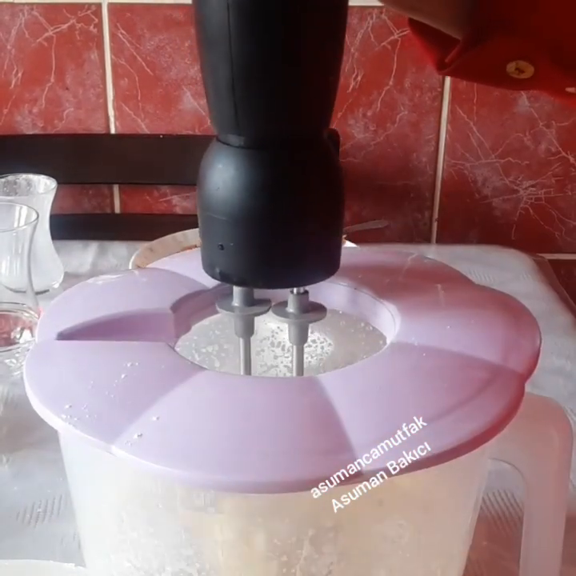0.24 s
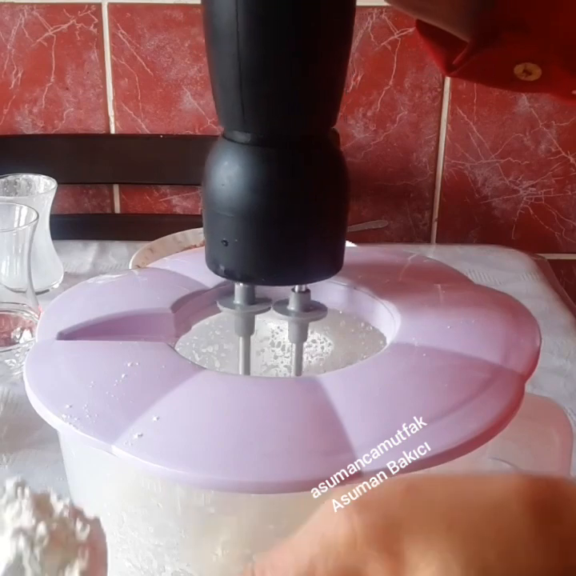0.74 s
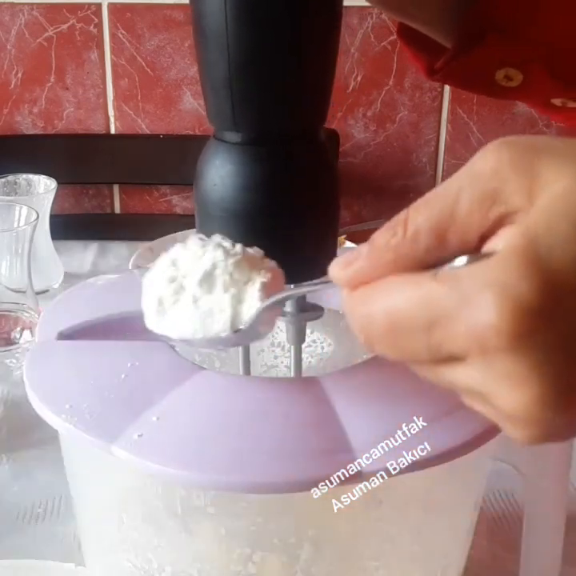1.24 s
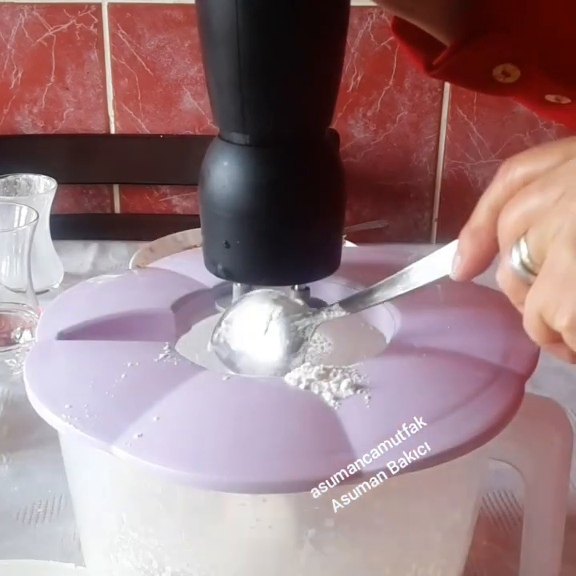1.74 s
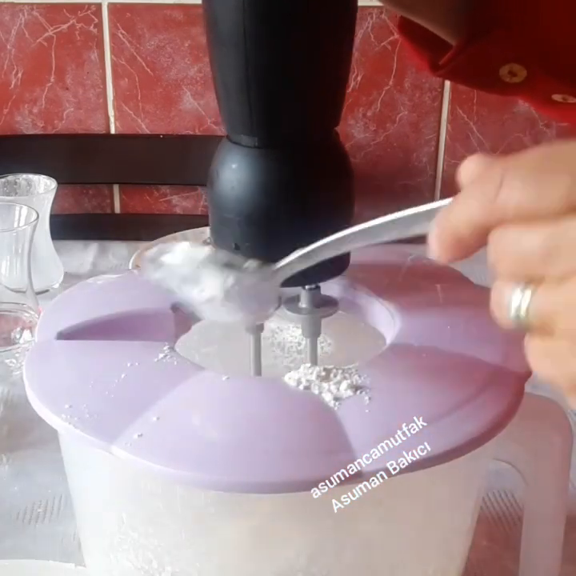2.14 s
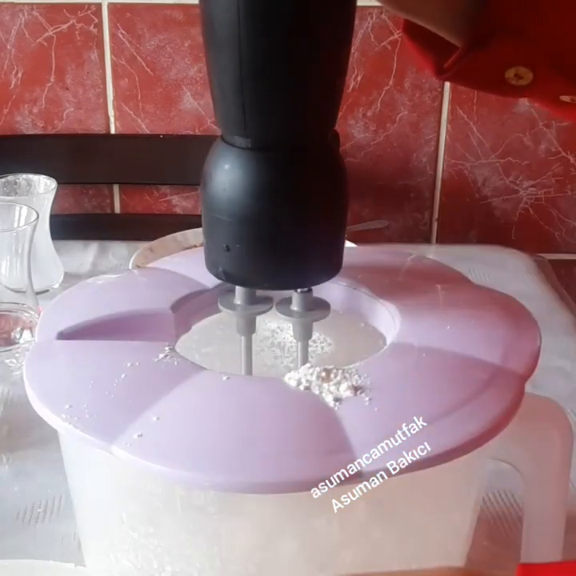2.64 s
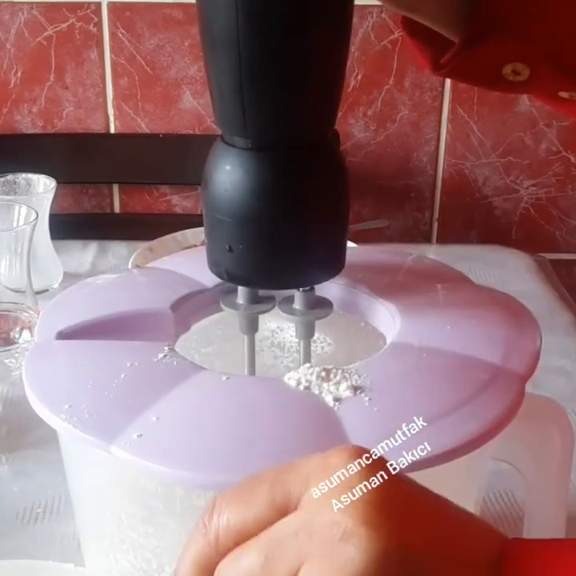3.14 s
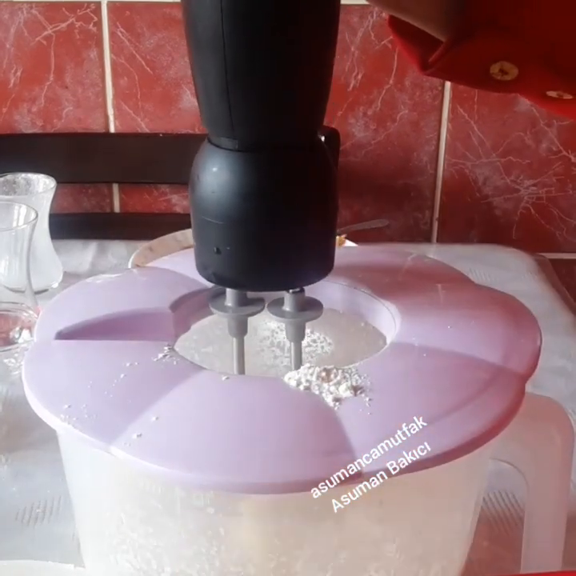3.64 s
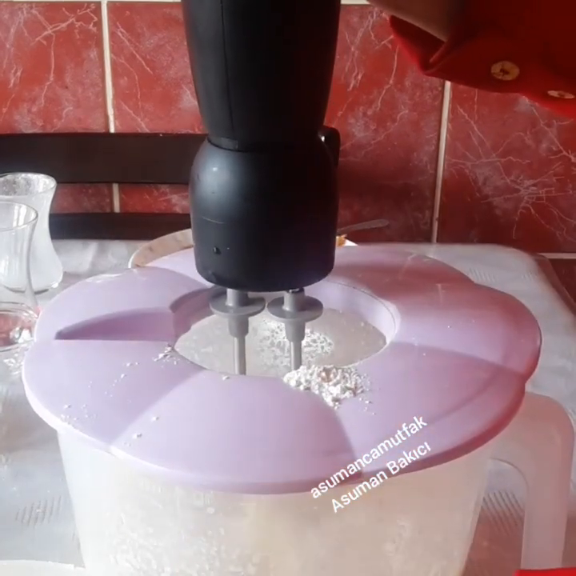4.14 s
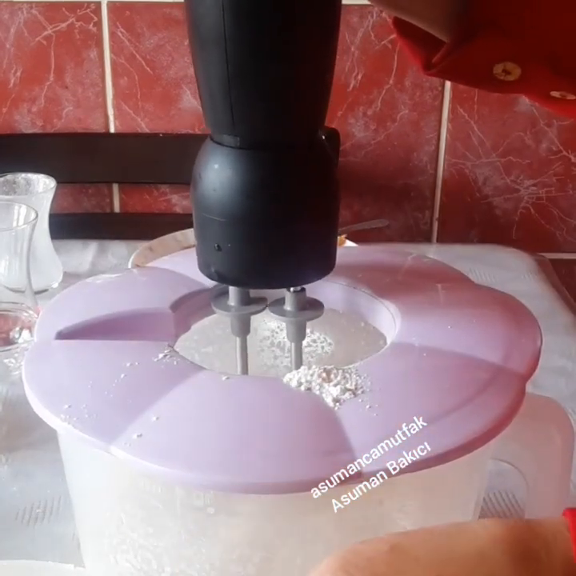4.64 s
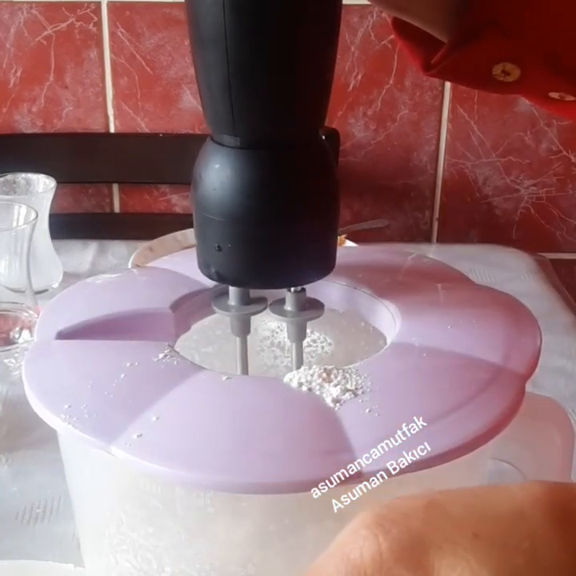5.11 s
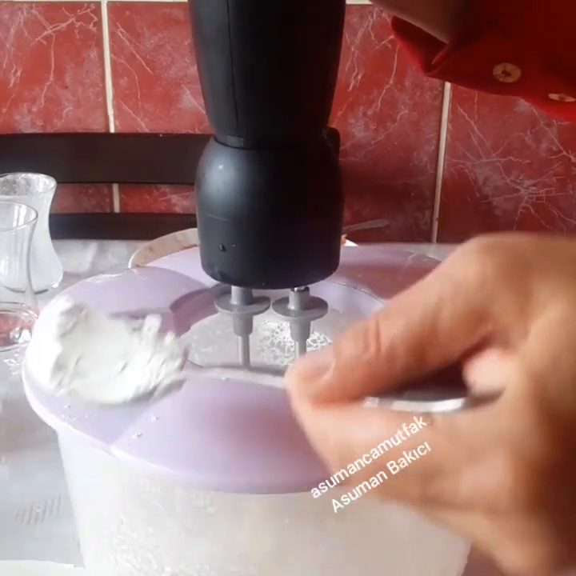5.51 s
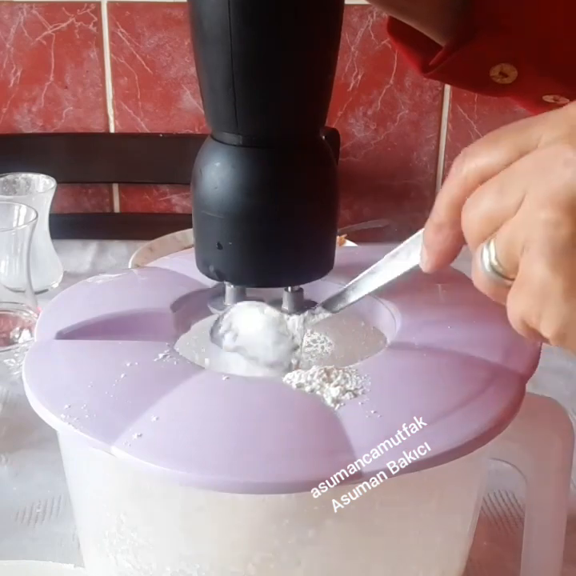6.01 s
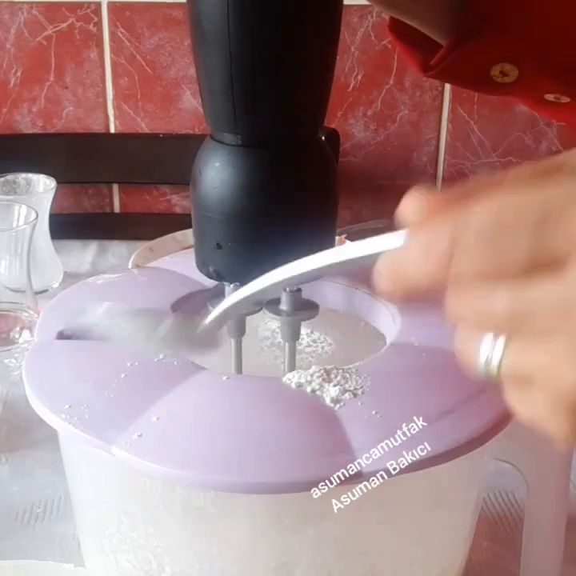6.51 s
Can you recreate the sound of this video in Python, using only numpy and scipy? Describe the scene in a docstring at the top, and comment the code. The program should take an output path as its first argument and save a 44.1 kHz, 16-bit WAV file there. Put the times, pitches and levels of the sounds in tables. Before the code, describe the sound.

From 0 to about 6.8 seconds an electric hand mixer runs at nearly constant speed, already going at the start and still going at the end. Its close stereo sound is a bright, harsh gear rasp and brushy hiss, with a high steady whine near 6.7 kHz and weaker tones below, wavering slightly. Beaters knock about 33 times a second, a rapid dry rattle, lighter around 1 second and stronger after 3. Batter churns as a low flutter, with irregular dull slaps in the hollow plastic bowl throughout, notably near 0.9, 3.2, 5.1 and 5.9, over faint rumble. Tiny steel ticks come at 0.3-0.7, 1.2-1.3 and 1.6-2.0, then sparsely from 4.7 to 6.5. Light plastic clacks fall near 1.9, 4.1, 5.0, 5.3 and 5.8. The rasp softens slightly around 1 second, then recovers. Short kitchen reflections, no lingering echo.

```python
"""An electric hand mixer whisks batter in a lidded plastic bowl in a tiled kitchen, heard close up in stereo.
Its motor runs near 241 turns a second: sines at multiples of that speed, with a high whine at the 28th.
Coloured noise makes the rasp of the gears and the hiss of the brushes; the beaters knock twice a turn.
Batter churns as noise and slaps as short bursts in the hollow of the bowl, over a low rumble.
While flour is spooned in, filtered clicks ring as steel ticks and plastic clacks now and then."""
import sys
import numpy as np
from scipy import signal
from scipy.fft import rfft, irfft, next_fast_len
from scipy.io import wavfile
from scipy.ndimage import map_coordinates

SR = 44100
rng = np.random.default_rng(int(sys.argv[2]) if len(sys.argv) > 2 else 0)


def waveform_to_disk(signal):
    """Save audio, clipped to [-1, 1], as 16-bit WAV at the path in sys.argv[1]."""
    frames = np.transpose(np.atleast_2d(signal))
    scaled = np.clip(frames, -1, 1) * 32767
    samples = np.round(scaled).astype(np.int16)
    wavfile.write(sys.argv[1], SR, samples)


N = 298557
T = np.arange(N) / SR  # s

# Levels in the tables are relative; some layers add a trim.
# the motor sags and recovers as the batter loads it: time_s, speed_turns_per_s
MOTOR_SPEED = [(0.0, 240.87), (0.18, 241.31), (0.52, 241.25), (0.72, 240.77), (0.88, 241.07),
               (0.92, 241.76), (1.06, 241.95), (1.26, 241.2), (1.44, 241.44), (1.7, 241.1), (1.8, 241.7),
               (1.9, 240.91), (1.96, 241.78), (2.06, 241.42), (2.14, 241.85), (2.18, 241.09),
               (2.34, 240.55), (2.7, 241.5), (2.82, 241.3), (3.08, 241.52), (3.26, 240.71), (3.56, 240.93),
               (4.28, 240.74), (5.52, 240.98), (5.74, 240.81), (6.12, 241.55), (6.22, 241.05),
               (6.26, 241.25), (6.3, 241.9), (6.36, 242.12), (6.5, 241.49), (6.66, 241.76), (6.7, 241.39),
               (6.76, 241.63)]
# motor tones: multiple of the rotor speed, level_db, left_over_right_db, left_lead_rad
MOTOR_TONES = [(3, -42.5, -0.5, 0.5), (4, -39, 4.5, 2.0), (5, -43.5, 6.5, 2.5), (6, -42, 4, 2.5),
               (12, -44.5, -5, 1.5), (13, -48.5, -3, 2), (15, -42, 4, 2), (20, -41, 11, 1.6),
               (22, -51, -5, 1.5), (25, -32, 4, -3), (29, -42, 8, 2), (30, -41, 9, -0.5), (31, -40, 7, 0),
               (32, -44, 4, 0.5), (34, -46, 4, 1), (39, -42, -1, -0.5), (40, -44, 0, 1.5), (41, -56, 0, 1),
               (42, -38.5, -1, 1.5)]
# the high whine: time_s, level_db
WHINE_LEVEL = [(0.0, -23), (0.12, -22.5), (0.22, -27), (0.32, -25.5), (0.5, -30), (0.76, -23.5),
               (0.9, -28.5), (1.08, -26), (1.18, -31), (1.3, -31), (1.58, -24), (1.74, -28), (2.02, -28.5),
               (2.16, -32.5), (2.28, -24.5), (2.4, -30), (2.5, -23.5), (2.84, -30.5), (3.1, -26),
               (3.22, -22), (3.42, -25.0), (4.14, -22.5), (4.42, -27), (4.68, -27), (5.14, -23.5),
               (5.46, -27), (5.7, -22.5), (6.12, -22.5), (6.28, -26), (6.42, -21.5), (6.7, -29),
               (6.76, -35)]
# the tone an octave under the whine: time_s, level_db
UNDERTONE_LEVEL = [(0.0, -30), (0.06, -35), (0.14, -44.5), (0.32, -40.5), (0.38, -50.0), (0.46, -52.0),
                   (0.56, -40.5), (0.84, -45.5), (0.92, -38), (1.08, -39.0), (1.22, -44.0), (1.54, -45),
                   (1.7, -50.0), (1.86, -37), (2.06, -46), (2.42, -32.5), (2.6, -37.5), (3.14, -34),
                   (3.84, -44), (4.08, -37), (4.2, -40), (4.8, -35), (4.98, -40), (5.76, -32.5),
                   (5.94, -44), (6.08, -41), (6.4, -36.0), (6.54, -42), (6.66, -33), (6.76, -31)]
# the second whine at 24 times the rotor speed: time_s, level_db
SECOND_WHINE_LEVEL = [(0.0, -27), (0.48, -33), (0.72, -30), (1.12, -40), (1.34, -41), (2.04, -47.0),
                      (2.22, -37), (2.62, -33), (3.36, -32), (3.54, -38.0), (3.96, -29), (4.72, -36.5),
                      (4.96, -29), (5.68, -33.0), (6.62, -35), (6.76, -36.5)]
# load on the gears, as the level of their rasp: time_s, level_db
GEAR_RASP_LEVEL = [(0.0, -16), (0.14, -16.5), (0.3, -16.5), (0.52, -18.5), (0.82, -18.0), (1.03, -20.5),
                   (1.31, -18.0), (1.46, -18.5), (1.89, -19.0), (2.07, -17.5), (2.15, -18), (2.57, -17),
                   (2.69, -16.5), (2.97, -16.0), (4.14, -16.5), (4.2, -17.5), (4.42, -16), (4.52, -16.5),
                   (5.11, -16), (5.3, -16.5), (5.4, -16.5), (6.17, -17.0), (6.44, -17), (6.75, -16.5)]
# brush and air hiss: time_s, level_db
HISS_LEVEL = [(0.05, -26), (0.41, -28.5), (1.65, -29), (2.68, -27), (6.43, -27), (6.6, -26.5)]
# the friction noise drops for an instant: middle_s, width_s, depth_db
FRICTION_LULLS = [(.398, 0.013, 3.5), (1.256, .0072, 5.5)]
# how hard the beaters press together, as the level of their knocking: time_s, level_db
BEATER_PRESSURE = [(0.0, -38), (0.12, -31.5), (0.33, -34), (0.38, -49), (0.53, -30), (0.6, -41),
                   (0.61, -30.5), (0.73, -38), (1.07, -43), (1.33, -34), (1.35, -37), (1.47, -32.5),
                   (1.59, -32), (1.68, -37.5), (1.95, -36.5), (2.1, -32), (2.46, -29.5), (2.5, -39),
                   (2.85, -31.5), (2.86, -39.0), (2.94, -34), (3.0, -28), (3.06, -34.5), (3.24, -29.5),
                   (3.35, -30.5), (3.54, -26.5), (3.6, -29.5), (4.17, -32.5), (4.25, -27), (4.82, -28),
                   (5.13, -34), (5.24, -28.5), (5.86, -26.5), (5.92, -35), (5.98, -29.5), (6.15, -43),
                   (6.19, -32.0), (6.31, -35), (6.38, -28), (6.5, -35), (6.67, -32.5), (6.75, -23)]
# what a knock of the beaters rings with: pitch_hz, level_db, width_s
KNOCK_RESONANCES = [(1434, 0.5, 0.0036), (1553, -12.5, 0.0026)]
# the knock itself is followed by a lighter one: share of the knock period later, level_db
LIGHT_KNOCK = (.455, -13)
# harder knocks of the beaters: middle_s, level_db, pitch_hz
HARDER_KNOCKS = [(.633, -21.5, 1470), (2.765, -25, 1440), (3.219, -24, 1550), (5.263, -23, 1470),
                 (6.401, -17.5, 1490)]
# churning of the batter: time_s, level_db
CHURN_LEVEL = [(0.05, -35.5), (0.25, -37), (0.33, -47), (.52, -35), (.82, -43), (1.2, -33), (1.25, -42),
               (1.33, -36), (2.3, -35.5), (2.41, -49), (2.56, -32.5), (2.84, -44), (3.05, -37.5),
               (4.1, -35), (4.48, -40.5), (4.7, -36), (5.3, -38.5), (5.7, -33), (5.79, -39), (5.87, -33),
               (6.33, -38), (6.7, -36.5)]
# slaps of the batter in the hollow of the bowl: middle_s, level_db, pitch_hz
BATTER_SLAPS = [(0.014, -22, 390), (0.089, -24, 400), (0.211, -25, 375), (0.535, -26, 440),
                (0.627, -29, 390), (0.75, -26, 385), (0.886, -19.5, 390), (0.979, -22, 393),
                (1.038, -26, 400), (1.12, -22, 385), (1.2, -23, 423), (1.484, -22, 385), (1.62, -26, 390),
                (1.73, -23, 370), (1.79, -28.0, 357), (1.95, -27, 370), (2.084, -27.5, 412),
                (2.292, -27, 385), (2.335, -28.0, 385), (2.472, -21, 382), (2.57, -25.0, 415),
                (2.617, -23, 375), (2.72, -27, 380), (3.007, -23, 364), (3.078, -26.5, 350),
                (3.181, -21.5, 373), (3.217, -20, 398), (3.328, -26, 394), (3.72, -26, 382),
                (3.809, -23, 385), (3.838, -24, 370), (3.88, -32, 405), (3.948, -26, 385), (3.97, -29, 395),
                (3.992, -30, 385), (4.047, -22, 390), (4.113, -27, 373), (4.16, -28, 380),
                (4.234, -24, 385), (4.28, -27, 385), (4.41, -27, 397), (4.605, -25, 384), (4.653, -24, 390),
                (4.701, -25, 405), (4.743, -26, 410), (4.768, -27, 377), (4.881, -22, 378),
                (4.95, -27.0, 415), (5.073, -25.5, 395), (5.105, -20, 415), (5.155, -27.5, 398),
                (5.189, -22.5, 415), (5.388, -23, 408), (5.612, -26, 390), (5.659, -23, 415),
                (5.704, -22, 378), (5.875, -20, 400), (5.937, -17.5, 370), (5.988, -24, 370),
                (6.116, -25, 395), (6.472, -24, 403), (6.614, -24, 375), (6.754, -24, 377)]
# the hollow of the bowl shifts its pitch as the batter swirls: time_s, pitch_hz
HOLLOW_PITCH = [(0.0, 397), (0.38, 381), (0.49, 422), (0.58, 392), (1.15, 385), (1.21, 414), (1.68, 377),
                (2.75, 386), (2.81, 401), (3.0, 369), (3.43, 407), (3.51, 380), (3.92, 393), (4.07, 376),
                (4.51, 397), (5.03, 382), (5.19, 409), (5.24, 373), (5.6, 391), (6.62, 384), (6.66, 411),
                (6.77, 374)]
# low rumble: time_s, level_db
RUMBLE_LEVEL = [(0, -48.5), (.8, -50.5), (1.5, -48), (3.3, -49.5), (3.6, -46.5), (4.4, -47.5), (5.2, -51.5),
                (5.7, -46.5), (6.2, -45.5), (6.7, -43.5)]
# sharp metal ticks: start_s, level_db
METAL_TICKS = [(.3444, -13), (.3954, -12), (.495, -12), (.552, -10), (.6858, -10), (1.2265, -12),
               (1.265, -14), (1.2662, -10), (1.2685, -10), (1.2758, -12), (1.609, -15), (1.6947, -20),
               (1.7992, -16), (2.0395, -14), (4.6699, -12), (4.8896, -14), (4.973, -19), (5.8057, -10),
               (6.1488, -16), (6.481, -11)]
# steel of beaters and spoon: pitch_hz, level_db, t60_s
STEEL_MODES = [(6650, -10, .011), (7200, -1, .011), (8050, 1, .009), (9350, -13, .007), (10000, -7, .01)]
# the bass dips briefly: middle_s, length_s, depth_db
BASS_DIP_TIMES = [(0.417, 0.048, 16), (0.99, 0.24, 24), (2.21, 0.12, 4), (2.38, 0.054, 7), (2.55, 0.13, 20),
                  (2.79, 0.12, 34), (3.123, 0.19, 22), (3.39, 0.063, 14), (5.87, 0.15, 28),
                  (6.117, 0.081, 14), (6.543, 0.15, 29)]
# clacks against the bowl: start_s, level_db
BOWL_CLACKS = [(1.879, -24), (4.130, -23), (4.971, -24), (5.2727, -18.5), (5.764, -23)]
# plastic of the bowl: pitch_hz, level_db, t60_s
PLASTIC_MODES = [(1654, -0.5, 0.022), (1750, 1, .013), (1950, -4, .009)]
# noise spectra of gears, brushes, batter and bowl: pitch_hz, level_db (per Hz)
RASP_SPECTRUM = [(4500, -39), (6100, -10), (6600, -1), (7000, -1), (7500, 0), (8150, -3), (8800, -6.5),
                 (10200, -10.5), (10500, -15.5), (12200, -17), (13400, -27.5), (14500, -34)]
HISS_SPECTRUM = [(60, -70), (110, -54), (200, -9.5), (300, 0.5), (560, -2.5), (800, -3.5), (1150, -2.5),
                 (1650, 2), (2100, 0), (2900, 2), (4000, 0), (5000, 3.5), (5550, 4), (5750, 8), (5950, 3),
                 (6300, 2.5), (6700, -3), (14000, -31)]
BATTER_SPECTRUM = [(60, -80), (110, -60), (165, -12.5), (205, -15.5), (240, -6), (290, -11), (345, -6),
                   (370, 3), (400, -8.5), (430, 0), (490, -10), (700, -12), (1200, -44)]
BOWL_SPECTRUM = [(20, -32), (45, -22), (70, -7.5), (100, -0.5), (125, 1.5), (150, -3), (185, -1.5),
                 (240, -2), (400, -32)]
# how alike left and right are, in general and for the rasp: pitch_hz, likeness (-1 to 1)
STEREO_LIKENESS = [(60, 0.5), (350, 0.76), (700, 0.36), (1100, 0.6), (1700, 0.06), (2600, -0.16),
                   (4000, -0.19), (5300, 0.27), (5900, -0.38), (7000, -0.5), (14000, 0.5)]
RASP_STEREO_LIKENESS = [(5000, 0.27), (6600, 0.78), (7500, 1), (10000, 1), (12000, 0.056), (14000, .1)]
# stereo balance, in general and for the rasp: pitch_hz, left_over_right_db
STEREO_BALANCE = [(60, -0.5), (500, -1.5), (1400, -1), (2600, 1.5), (4000, -1), (5500, 2.5), (9000, -7),
                  (14000, 0)]
RASP_STEREO_BALANCE = [(6000, -5), (6750, 1), (7000, 9.5), (7700, 4.5), (8200, 1.5), (8400, 2), (8900, 0),
                       (9600, 1.5), (11000, -1), (13000, 7)]

GEAR_RATIO = 14.48  # rotor turns per beater turn
KNOCK_SPREAD_DB, KNOCK_JITTER_S = 1.8, .00005
CHATTER_S, CHATTER_LOSS_DB = 0.0051, 6  # mean spacing of the touches, loss per touch
PEAK_LIMIT, CUTOFF_HZ = .76, 14000
LEFT_RIGHT = np.array([[1], [-1]])


def from_db(db):
    """Decibels to gain."""
    return np.exp(np.asarray(db) * (np.log(10) / 20))


def rms_one(x):
    """Scale to unit power."""
    return x / np.sqrt(np.mean(x ** 2) + 1e-20)


def in_time(rows):
    """The second column of a curve, read at every sample."""
    time_s, values = np.transpose(rows)
    return np.interp(T, time_s, values)


def at_hz(points, hz):
    """Read a spectrum on a log-frequency axis."""
    points_hz, values = np.transpose(points)
    return np.interp(np.log(hz), np.log(points_hz), values)


def drift(rate_hz):
    """Random wander of spread 1: noise through two equal low-passes, computed at every 40th sample."""
    r = np.exp(-2 * np.pi * rate_hz * 40 / SR)
    white = rng.standard_normal(N // 40 + 2002)
    slow = signal.lfilter([1], [1, -2 * r, r * r], white)[2000:]  # skip the filter's start
    return np.interp(np.arange(N) / 40, np.arange(len(slow)), rms_one(slow))


def pan(db):
    """Left and right gains of fixed total power, left over right by this many dB."""
    return rms_one(from_db(LEFT_RIGHT * db / 2))


def throb(turns, depth):
    """A swell once in every cycle of turns."""
    return 1 + depth * np.cos(2 * np.pi * turns)


def ring(clicks, modes):
    """Clicks set two-pole resonators ringing, each with its own pitch and decay."""
    out = 0
    for hz, db, t60_s in modes:
        r = from_db(-60 / (t60_s * SR))  # loss per sample
        w = 2 * np.pi * hz / SR
        resonance = signal.lfilter([0, np.sin(w)], [1, -2 * r * np.cos(w), r * r], clicks + 1e-18)
        out = out + from_db(db) * resonance
    return out


def burst(s, hz, width_s):
    """A brief push swells and dies in one resonance: its sample positions and waveform."""
    first = max(int((s - 4 * width_s) * SR), 0)
    last = min(int((s + 4 * width_s) * SR), N)
    at = np.arange(first, last)
    t = T[at] - s
    return at, np.exp(-.5 * (t / width_s) ** 2) * np.sin(2 * np.pi * hz * t)


def colour(white, spectrum, likeness, balance):
    """Two noises become a stereo pair with this spectrum, likeness and balance; rms 1."""
    size = next_fast_len(N)
    hz = np.maximum(np.arange(size // 2 + 1) * SR / size, 1)
    mid, side = rfft(white, size)
    alike = np.clip(at_hz(likeness, hz), -1, 1)
    pair = np.sqrt(1 + alike) * mid + np.sqrt(1 - alike) * side * LEFT_RIGHT
    gain = from_db(at_hz(spectrum, hz) + LEFT_RIGHT * at_hz(balance, hz) / 2)
    return rms_one(irfft(pair * gain, size)[:, :N])


def worn_surface(turns, repeat):
    """Friction noise: a share comes back alike on every cycle of turns, the rest is new."""
    size = int(N / turns[-1])  # samples in a mean cycle
    place = [turns % 1 * size]
    tracks = [map_coordinates(p, place, order=3, mode="grid-wrap") for p in rng.standard_normal((2, size))]
    return np.sqrt(repeat) * np.array(tracks) + np.sqrt(1 - repeat) * rng.standard_normal((2, N))


def motor_tones(rotor, flutter_db):
    """Imbalance, fan and armature slots sing at multiples of the rotor speed, each wavering a little."""
    out = 0
    for multiple, db, pan_db, lead_rad in MOTOR_TONES:
        phase = 2 * np.pi * ((multiple * rotor + rng.random()) % 1) + 0.014 * multiple * drift(5.1)
        tone = np.sin(np.float32(phase + LEFT_RIGHT * lead_rad / 2))
        level = from_db(db + flutter_db * drift(12.4))
        out = out + np.sqrt(2) * level * pan(pan_db) * tone
    return out


def whine(rotor, beater, wobble_rad, flutter_db):
    """The 28th multiple sings high; the load of the four beater wires shakes its level and phase."""
    wires = 4 * beater + .42
    shake = wobble_rad * np.sin(2 * np.pi * wires + 1)
    shake += 0.16 * np.sin(2 * np.pi * 2 * beater) + 0.24 * drift(60)
    swells = throb(wires, depth=0.27) * throb(2 * beater + 0.46, depth=0.049)
    swells *= throb(wires + 2 * beater, depth=0.13)
    level = swells * from_db(flutter_db * drift(39))
    tone = rms_one(level * np.sin(2 * np.pi * 28 * rotor + shake))
    return from_db(in_time(WHINE_LEVEL) + 0.9) * pan(-1.3) * tone


def swelling_tone(rotor, curve, db, pan_db, lead_rad, waver_rad, rough_rad, order):
    """A multiple of the rotor speed swells, fades and wavers; its phase leads on the left."""
    phase = 2 * np.pi * order * rotor + LEFT_RIGHT * lead_rad / 2
    phase = phase + waver_rad * drift(13) + rough_rad * drift(70)
    level = from_db(in_time(curve) + db + 2.0 * drift(14))
    return level * pan(pan_db) * np.sqrt(2) * np.sin(phase)


def scrape(beater, depth, sharpness):
    """The gears rasp harder for an instant at each knock, twice a beater turn."""
    return 1 + depth * np.exp(sharpness * (np.cos(2 * np.pi * (2 * beater - .29)) - 1))


def grit(rotor, per_s, spread_db):
    """Uneven crackles of the brushes, bunched on three segments of every rotor turn; rms 1."""
    born = rng.random(N) < per_s / SR * throb(3 * rotor, depth=.9)
    sizes = from_db(spread_db * np.minimum(rng.exponential(1, N), 3))
    return rms_one(born * sizes * rng.choice([-1, 1], (2, N)))


def reflections(x, strength, count):
    """Bowl, table and tiles send back echoes within 12 ms, other ones to each ear."""
    out = x.copy()
    for ear in range(2):
        for lag in (rng.uniform(.001, .012, count) * SR).astype(int):
            out[ear, lag:] += strength * rng.choice([-1, 1]) * x[ear, :-lag]
    return out


def friction(rotor, beater):
    """Gears rasp and brushes hiss, pulsing with the rotor turns, passing wires and, for the gears, knocks."""
    wires = 4 * beater + .45
    meshing = throb(rotor, depth=0.026) * throb(wires, depth=0.025)
    meshing *= scrape(beater, depth=0.23, sharpness=5.7)
    sparking = throb(rotor, depth=0.026) * throb(2 * rotor, depth=0.062) * throb(wires, depth=0.026)
    teeth_flutter = from_db(0.86 * np.minimum(drift(330), 2) + 0.64 * drift(40))
    brush_flutter = from_db(0.97 * np.minimum(drift(140), 2) + 0.91 * drift(13.4))
    teeth = worn_surface(2 * beater, repeat=0.17) * meshing * teeth_flutter
    brushes = worn_surface(2 * beater, repeat=0.17) * sparking * brush_flutter
    crackle = grit(rotor, per_s=1500, spread_db=1.8)
    teeth = teeth + from_db(-8.5) * crackle
    brushes = brushes + from_db(-7.5) * crackle
    rasp = colour(teeth, RASP_SPECTRUM, RASP_STEREO_LIKENESS, RASP_STEREO_BALANCE)
    rasp = from_db(in_time(GEAR_RASP_LEVEL) - 2.0) * rasp
    hiss = colour(brushes, HISS_SPECTRUM, STEREO_LIKENESS, STEREO_BALANCE)
    hiss = rms_one(reflections(hiss, strength=0.085, count=8))
    hiss = from_db(in_time(HISS_LEVEL) + 5.0) * hiss
    lull_db = sum(db * np.exp(-((T - s) / width_s) ** 2) for s, width_s, db in FRICTION_LULLS)
    return from_db(-lull_db) * (rasp + hiss)


def knocks(beater, knock_db, hard_width_s):
    """Twice a turn the beaters knock in nearly strict time, with a lighter touch in between."""
    count = np.arange(int(2 * beater[-1])) + .275
    body, hard = np.zeros((2, N))
    for later, touch_db in ((0, 0), LIGHT_KNOCK):
        times_s = np.interp(count + later, 2 * beater, T)
        for s, (late, force) in zip(times_s, rng.standard_normal((len(count), 2))):
            for hz, db, width_s in KNOCK_RESONANCES:
                at, wave = burst(s + KNOCK_JITTER_S * late, hz, width_s)
                body[at] += from_db(db + touch_db + KNOCK_SPREAD_DB * force) * wave
    for s, db, hz in HARDER_KNOCKS:
        at, wave = burst(s, hz, hard_width_s)
        hard[at] += from_db(db) * wave
    # under a light load the beaters barely touch
    contact = 1 / (1 + from_db(2 * (-39.0 - knock_db)))
    left = rms_one(body) * from_db(knock_db - 0.5) * contact + hard
    right = np.interp(T - .00008, T, left)  # 0.08 ms later on the right
    return pan(5.8) * np.array([left, right])


def hollow(beater, level_db, flutter_hz):
    """The stirred batter keeps the hollow of the bowl booming, with a flutter from the passing wires."""
    carrier = np.exp(2j * np.pi * np.cumsum(in_time(HOLLOW_PITCH)) / SR)
    wander = drift(flutter_hz) + 1j * drift(flutter_hz)
    boom = np.real(wander * carrier) * throb(4 * beater + 0.15, depth=0.47)
    return from_db(level_db) * pan(-1.2) * rms_one(boom)


def batter(beater, batter_db, lumps_db, slap_s):
    """Wires churn the batter, partly alike on every turn; lumps make the hollow of the bowl boom."""
    churn = worn_surface(beater, repeat=0.26) * throb(4 * beater + 0.19, depth=0.081)
    churn = churn * from_db(lumps_db * drift(35))
    slaps = np.zeros(N)
    for s, db, hz in BATTER_SLAPS:
        at, wave = burst(s, hz, slap_s)
        slaps[at] += from_db(db - 2.5) * wave
    boom = hollow(beater, batter_db - 5.5, flutter_hz=27)
    churn = colour(churn, BATTER_SPECTRUM, STEREO_LIKENESS, STEREO_BALANCE)
    return from_db(batter_db - 1.6) * churn + boom + slaps


def rumble(rotor, level_db, flicker_db, flicker_hz):
    """A low noise rumble and a hum at half the rotor speed flicker together."""
    hum = from_db(-2.5) * np.sin(np.pi * rotor)
    db = level_db + flicker_db * np.minimum(drift(flicker_hz), .6)
    noise = colour(rng.standard_normal((2, N)), BOWL_SPECTRUM, STEREO_LIKENESS, STEREO_BALANCE)
    return from_db(db) * (hum + noise)


def ticks():
    """Brief touches ring the steel, slightly softened by flour and batter."""
    clicks = np.zeros(N)
    for s, db in METAL_TICKS:
        clicks[round(s * SR)] = from_db(db)
    band = signal.butter(6, [5000, 10200], "band", fs=SR, output="sos")
    clicks = signal.sosfilt(band, clicks + 1e-12 * rng.standard_normal(N))
    return pan(2.5) * ring(clicks, STEEL_MODES)


def bass_dips(x, edge_hz):
    """All the bass below an edge dips briefly now and then."""
    dip_db = sum(depth * np.exp(-(2 * (T - s) / length_s) ** 4) for s, length_s, depth in BASS_DIP_TIMES)
    bass = signal.sosfiltfilt(signal.butter(6, edge_hz, fs=SR, output="sos"), x)
    return x - (1 - from_db(-dip_db)) * bass


def clacks():
    """Each contact chatters four times, ever weaker, against the ringing plastic of the bowl."""
    clicks = np.zeros(N)
    touch = np.arange(4)
    for (s, db), spacing in zip(BOWL_CLACKS, rng.uniform(.7, 1.3, (len(BOWL_CLACKS), 4))):
        at = ((s + CHATTER_S * touch * spacing) * SR).astype(int)
        clicks[at] = from_db(db - CHATTER_LOSS_DB * touch)
    band = signal.butter(2, [1350, 2200], "band", fs=SR, output="sos")
    return pan(2.0) * ring(signal.sosfilt(band, clicks + 1e-18), PLASTIC_MODES)


def scene():
    """The rotor drives the mixer's sounds, the beaters through a worm gear."""
    speed = in_time(MOTOR_SPEED) * (1 + 0.000202 * drift(11.4))
    rotor = np.cumsum(speed) / SR  # turns so far
    beater = rotor / GEAR_RATIO
    # the motor tones rise and fall with the rasp of the gears
    load = from_db(1.45 * (in_time(GEAR_RASP_LEVEL) + 17.5))
    tones = load * motor_tones(rotor, flutter_db=2.0)
    tones += whine(rotor, beater, wobble_rad=0.16, flutter_db=1.6)
    tones += swelling_tone(rotor, UNDERTONE_LEVEL, db=-1.0, pan_db=7.5, lead_rad=1.4,
                           waver_rad=0.37, rough_rad=.38, order=14)
    tones += swelling_tone(rotor, SECOND_WHINE_LEVEL, db=0.8, pan_db=6, lead_rad=2.24,
                           waver_rad=.4, rough_rad=0.32, order=24)
    rattle = knocks(beater, in_time(BEATER_PRESSURE) - .9, hard_width_s=0.0029)
    bowl = batter(beater, in_time(CHURN_LEVEL) + 0.8, lumps_db=1.6, slap_s=0.0052)
    bowl += rumble(rotor, in_time(RUMBLE_LEVEL), flicker_db=8.0, flicker_hz=13.0)
    mix = tones + friction(rotor, beater) + rattle + bowl + ticks() + clacks()
    return bass_dips(mix, edge_hz=176)


def record(dry):
    """Peaks above the limit are clipped, then the top is cut steeply."""
    clipped = np.clip(dry, -PEAK_LIMIT, PEAK_LIMIT)
    return signal.sosfilt(signal.ellip(10, .1, 90, CUTOFF_HZ, fs=SR, output="sos"), clipped)


dry = scene()
out = record(dry)
waveform_to_disk(out)
```